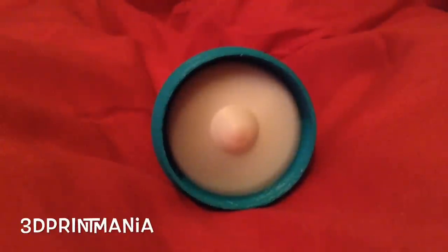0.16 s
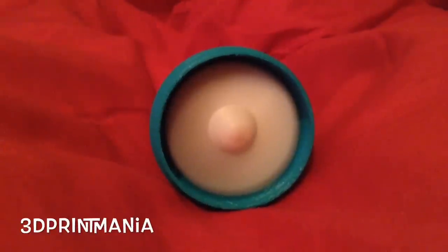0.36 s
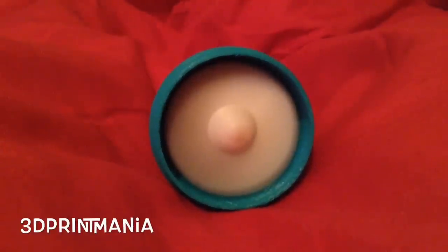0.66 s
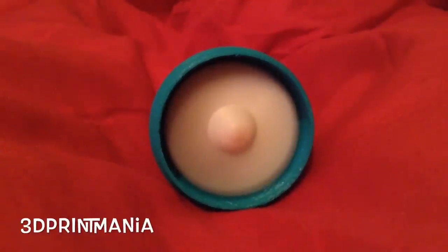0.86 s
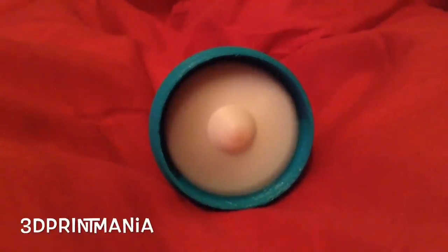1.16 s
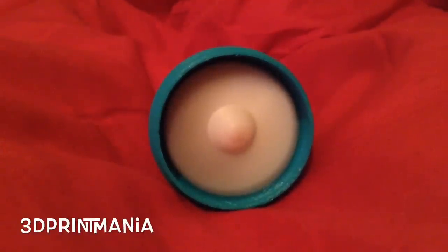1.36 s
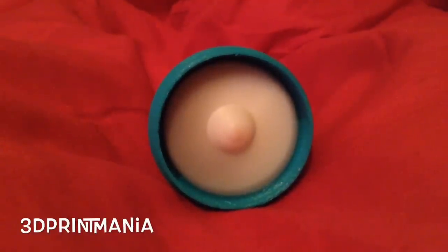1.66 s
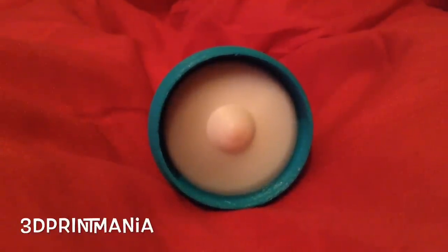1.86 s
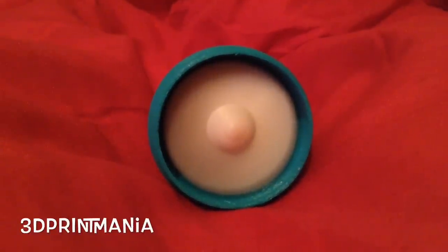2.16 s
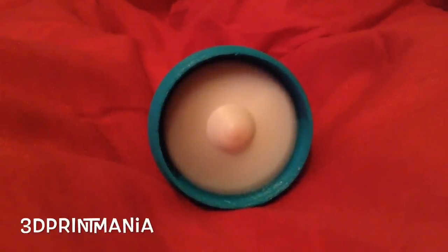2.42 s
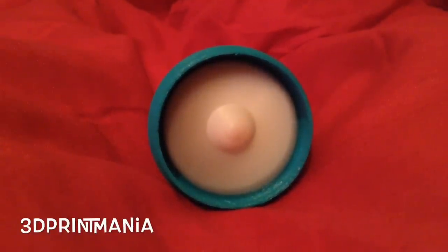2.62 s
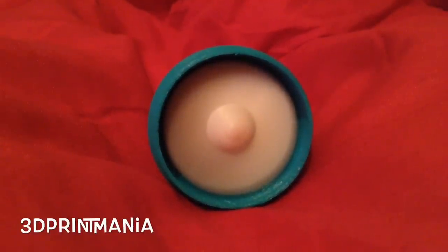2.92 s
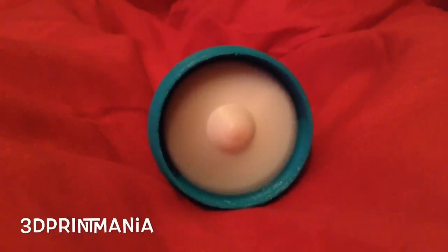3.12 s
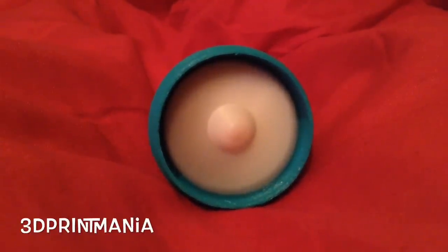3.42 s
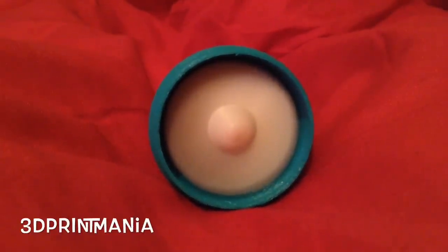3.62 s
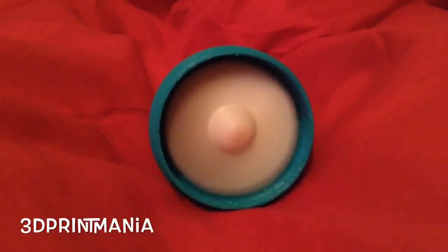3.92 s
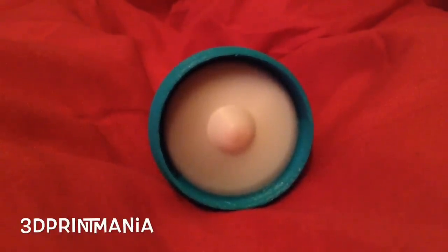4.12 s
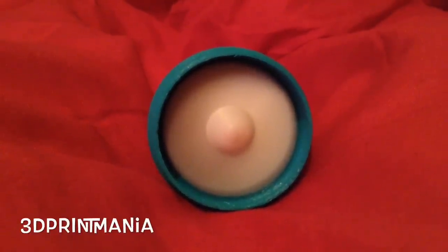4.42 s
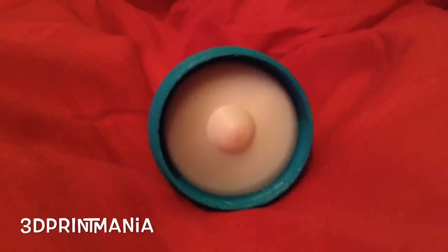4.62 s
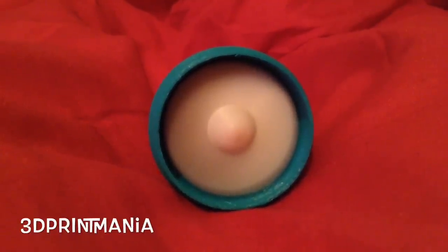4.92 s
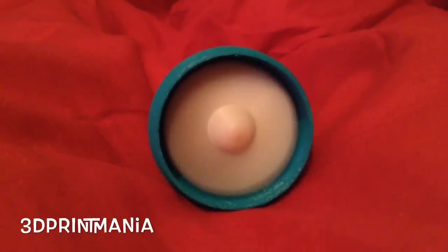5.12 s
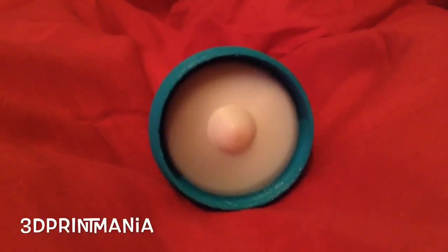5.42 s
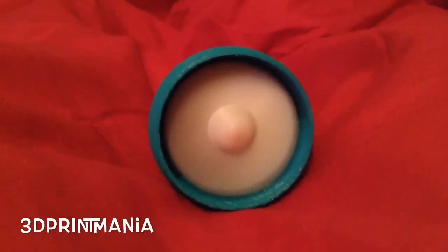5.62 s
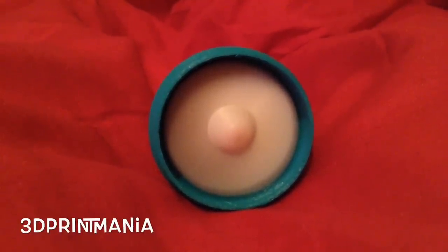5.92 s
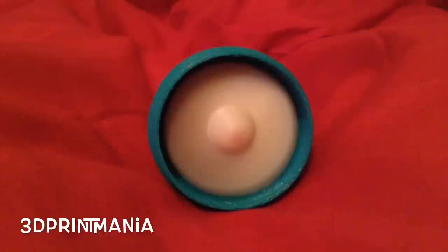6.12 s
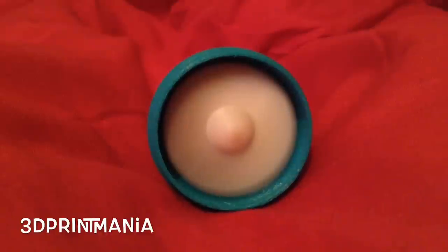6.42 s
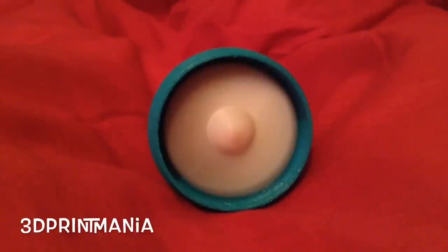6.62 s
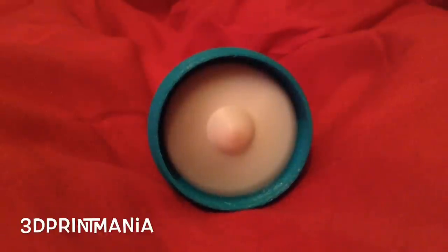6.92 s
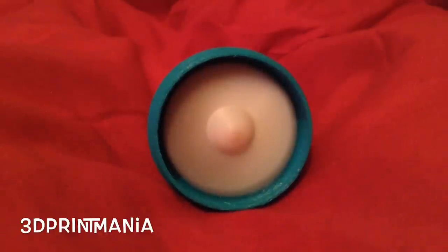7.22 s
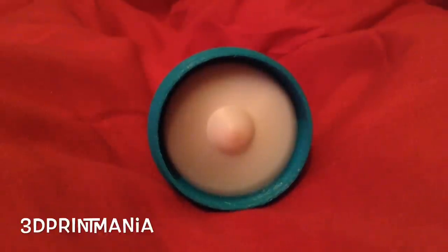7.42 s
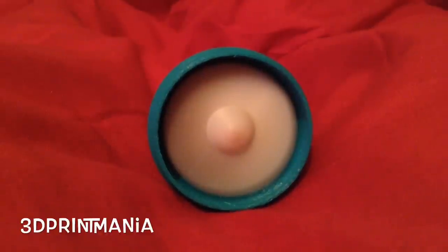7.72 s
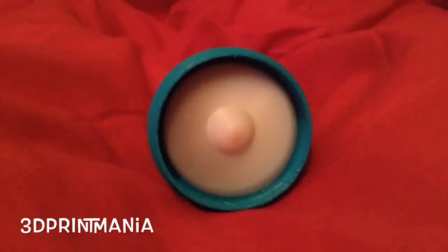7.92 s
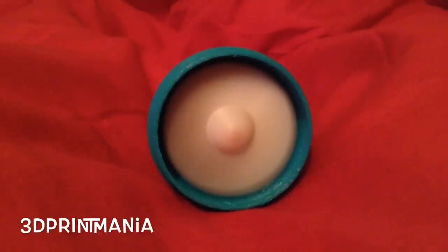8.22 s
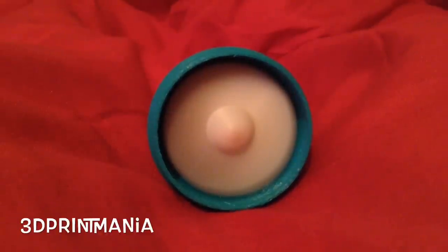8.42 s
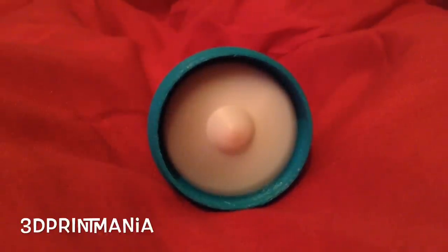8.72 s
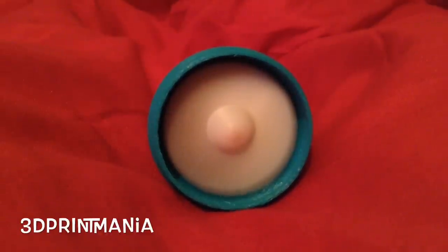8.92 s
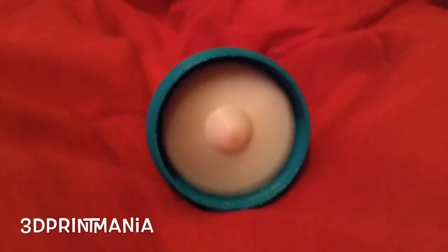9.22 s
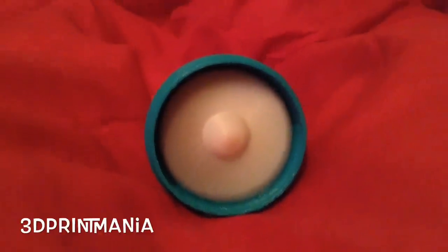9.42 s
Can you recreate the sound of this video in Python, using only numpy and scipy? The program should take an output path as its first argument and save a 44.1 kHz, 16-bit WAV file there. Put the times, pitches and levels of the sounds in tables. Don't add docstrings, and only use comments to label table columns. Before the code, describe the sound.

Very close in a quiet, soft room, fingers rub and tick lightly on plastic for a quarter second. Then a small ducted fan starts, its pitch climbing fast for about a second. It runs on with a faint low hum, smooth rushing air, gritty high brush buzz and a fixed thin whine, sagging slightly in pitch. A sharp tick comes near four seconds, with smaller clicks afterwards.

```python
import sys
import numpy as np
from scipy import signal
from scipy.fft import rfft, irfft, next_fast_len
from scipy.io import wavfile

SR = 44100
rng = np.random.default_rng(int(sys.argv[2]) if len(sys.argv) > 2 else 0)


def transcribe(signal):
    frames = np.atleast_2d(signal).T
    limited = np.clip(frames, -1, 1)
    pcm = np.round(limited * 32767).astype(np.int16)
    wavfile.write(sys.argv[1], SR, pcm)


def volts_from_decibels(level):
    exponent = np.asarray(level, float) / 20
    return 10 ** exponent


N = 421596

# start_s, speed_turns_per_s
TOP_SPEED = [(1.5, 108.022), (2.4, 107.351), (3.2, 106.862), (3.6, 106.854), (4.4, 106.402), (4.7, 106.144),
             (5.2, 105.981), (5.6, 105.526), (6.5, 105.299), (7.3, 104.868), (8.4, 104.439), (8.9, 104.427),
             (9.56, 104.174)]
# pitch_hz, level_db
HUM_ONCE = [(47, -95), (63, -68), (74, -66), (82, -69), (87, -78), (92, -61), (99.5, -52.5), (104.4, -52.8),
            (105.5, -52), (106.6, -50)]
# pitch_hz, level_db
HUM_TWICE = [(95, -80), (126, -70), (148, -65), (164, -56), (174, -54), (183, -60), (192, -62), (210, -62),
             (213.5, -60)]
# multiple_of_shaft_rate, level_db rms
BLADE_TONES = [(15, -70), (20, -56), (30, -60), (40, -66), (41, -62.5), (43, -61)]
# pitch_hz, width_hz, level_db
DUCT_RESONANCES = [(1976, 770, 0.5), (4310, 230, 2.5)]
# multiple_of_shaft_rate, running_up_db, cold_db, warm_db
BRUSH_CONTACTS = [(56, 1, 5, 7), (58, 1, 3, 5), (59, -2, 5, 1), (61, 5, 6, 9), (63, 3, 1, 4),
                  (64, -8, 2, -8), (66, 2, 9, 4), (68, 2, 6, 7), (69, -2, 0, -11), (70, -1, 7, 6),
                  (71, 3, 5, 3), (72, 5, 9, 4), (73, 3, -15, 0), (74, 0, 7, -14), (75, -1, -4, -14),
                  (76, 6, 10, 4), (77, -1, 0, -18), (78, 5, 2, 1), (79, -3, -8, -13), (80, 1, -12, 1),
                  (81, -10, -5, -1), (82, 10, 1, 8), (83, -7, -8, 7), (84, 4, -4, 6), (85, -6, 3, 5),
                  (86, 3, -4, -5), (87, -2, 5, 2), (92, 2, -6, -6), (97, 3, 0, -2), (102, 2, 2, 8)]
# start_s, warm_share (0 to 1), contact_level_db
BRUSH_SEATING = [
    (1.1, 0, -1),
    (1.5, 0.97, 0),
    (2.3, 0.2, -0.5),
    (4, 0.29, 0),
    (5.5, 0.55, 0.5),
    (7, .75, 1),
    (8.2, 1, .5),
    (9.56, 0.93, -1),
]
# pitch_hz, width_hz, level_db
HOUSING_RESONANCES = [(4270, 650, -59.5), (5851.0, 1000.0, -77), (6563, 143, -57.5), (6870, 660, -53),
                      (7710, 530, -55.5), (7880, 20, -54), (8066, 450, -49.5), (8350, 465, -50.5),
                      (9060, 120, -62), (10250, 2030, -58.5), (12270, 940, -66), (13400, 980, -65),
                      (15126.0, 900.0, -67)]
# multiple_of_chop_rate, level_db rms
CHOP_LINES = [(43, -67.0), (44, -67.6), (45, -60.6), (46, -61.9), (47, -62.4), (48, -55.8), (49, -48.0),
              (50, -50.8), (51, -57.5), (52, -77.9), (55, -66.4), (56, -64.5), (57, -62.7), (58, -56.9),
              (59, -54.9), (60, -50.4), (61, -50.3), (62, -67.1), (63, -63.9), (64, -60.4), (65, -57.8),
              (66, -63.4), (72, -65.4), (73, -62.2), (74, -56.1)]
# multiple_of_chop_rate, level_db rms
STALL_LINES = [(16, -71), (21, -68), (50, -51), (51, -50), (52, -58), (53, -63), (60, -58), (64, -56),
               (66, -54), (67, -66)]
# pitch_hz, level_db per Hz
RUSH_SPECTRUM = [(300, -18), (427, -16.5), (600, -8.5), (819, -13), (1380, -11.5), (1800, -7.5), (2060, -8),
                 (2600, -12.5), (3410, -18), (5290, -19.5), (6500, -30), (9000, -46)]
# pitch_hz, level_db per Hz
RUMBLE_SPECTRUM = [(24, -55), (40, -30), (70, -20), (100, -17), (140, -5), (205, -3.5), (330, -6.5),
                   (450, -11), (700, -22)]
# start_s, peak_db, ring_pitch_hz, edge_db
TICKS = [(0.009, -43, 802, -10), (0.056, -41, 1380, -11), (0.162, -47, 1440, -6), (0.187, -46, 676, -23),
         (0.2388, -26.5, 905, -12.5), (0.369, -35.5, 1260, -12), (1.07, -31, 799, -20),
         (1.147, -26, 1950, -28), (3.932, -12, 970, -13.5), (4.5, -26, 1840, -8), (4.962, -23.5, 830, -18)]
# start_s, peak_db, ring_pitch_hz, edge_db
SCUFF = (5, -26, 0, -8)
# pitch_hz, t60_s
CASE_MODES = [(700, 0.0046), (830, 0.022), (960, 0.017), (1110, 0.03), (1300, 0.015), (1550, 0.018),
              (1850, 0.0057), (2700, 0.036), (3600, 0.0053), (4600, 0.0048), (5500, 0.0015)]
# start_s, peak_db, pitch_hz, t60_s
KNOCKS = [
    (5.607, -34, 2950, .02),
    (6.315, -27.5, 5920, 0.037),
    (6.31, -36, 6500, .02),
    (6.315, -34, 970, .015),
    (6.323, -33, 5000, .01),
    (6.322, -40, 3400, .01),
    (9.398, -29, 280, 0.032),
    (9.399, -35, 840, 0.026),
]
# start_s, held_s, level_db
CLOTH_RUBS = [
    (-.01, .072, -55),
    (.165, .062, -52),
    (.24, .008, -50),
    (.27, .02, -66),
]
# pitch_hz, width_hz, level_db rms
ROOM_HUMS = [(106.5, 11, -78), (153, 35, -68.5), (545, 7.4, -77.5), (846.6, 25, -67.5)]
# pitch_hz, width_hz, level_db
DULL_BANDS = [(437, 92, -4), (4990, 830, -3), (10900, 800, -7.5), (11900, 110, 1), (14300, 710, -8),
              (8900, 200, -3)]
# pitch_hz, level_db
MASKED_BANDS = [(3500, -60), (4700, -36), (5300, -34), (6000, -40), (8500, -33), (9200, -26), (11000, -23),
                (13000, -24), (14500, -28)]

SWITCH_ON_S = .266
SPIN_FROM_S, SPIN_UP_S, SPIN_BEND, FULL_SPEED = .2277, .83, .5366, 106
CYCLE_POINTS = 2 ** 14

FAINT_DB, FAINT_SPREAD_DB = -5.5, 2.5
FINE_DB, FINE_SPREAD_DB = -1.6, 4
SLOTS_DB, EVEN_DB = 11, 2
CONTACT_FOLLOWS, SEATED_S = 2.1, 1.1
SHAKE_TURNS = .0012
HISS_IDLE_DB, HISS_RUN_DB, HISS_LOAD_DB = 14, 14, 14
IDLE_TOP_HZ, IDLE_AIR_DB = 8950, -7
GAP_HZ, GAP_WIDTH_HZ, GAP_DB = 5250, 700, -7

CHOP_PER_S, CHOP_SAG_PER_S2 = 204.366, .0215
RING_ON, SMEAR_RAD = .6, .55

RUSH_DB, RUSH_FOLLOWS, RUSH_STILL_DB = -43, 2.74, -66
RUMBLE_DB, RUMBLE_FOLLOWS, RUMBLE_STILL_DB = -53, 3.6, -73.5

CRACK_T60_S, CRACK_DB = 0.014, 1
RUB_RISE_DB_PER_S, RUB_FALL_DB_PER_S = 2500, 600
MIC_TOP_HZ = 15330


def in_time(rows):
    s, *columns = np.transpose(rows)
    return [np.interp(np.arange(N) / SR, s, c) for c in columns]


def rms_one(x):
    return x / np.sqrt(np.mean(x ** 2) + 1e-20)


def drift(rate):
    r = np.exp(-80 * np.pi * rate / SR)
    white = rng.standard_normal(N // 40 + 2002)
    slow = signal.lfilter([1], [1, -2 * r, r * r], white)[2000:]
    return np.interp(np.arange(N) / 40, np.arange(len(slow)), rms_one(slow))


def repeat(cycles, orders, levels_db, phases):
    lines = np.zeros(CYCLE_POINTS // 2 + 1, complex)
    lines[np.array(orders, int)] = volts_from_decibels(levels_db) * np.exp(1j * phases) * CYCLE_POINTS / np.sqrt(2)
    position = cycles % 1 * CYCLE_POINTS
    return np.interp(position, np.arange(CYCLE_POINTS), irfft(lines), period=CYCLE_POINTS)


def shaft():
    since = np.maximum(np.arange(N) / SR, SWITCH_ON_S) - SPIN_FROM_S
    return in_time(TOP_SPEED)[0] * np.tanh(since / SPIN_UP_S) ** SPIN_BEND


def rotor(turns, speed, rush_db):
    once_db = np.interp(speed, *np.transpose(HUM_ONCE))
    twice_db = np.interp(2 * speed, *np.transpose(HUM_TWICE))
    out = np.sqrt(2) * volts_from_decibels(once_db + 1.4) * np.sin(2 * np.pi * turns)
    out += np.sqrt(2) * volts_from_decibels(twice_db + 2.0 * drift(10)) * np.sin(2 * np.pi * 2 * turns)
    for order, db in BLADE_TONES:
        duct = 0
        for hz, width, peak_db in DUCT_RESONANCES:
            duct = duct + volts_from_decibels(peak_db) / (1 + (2 * (order * speed - hz) / width) ** 2)
        tone = np.sin(2 * np.pi * order * turns + 0.41 * drift(15))
        level_db = db + .5 * (rush_db + 45.5) + 1.07 * drift(24)
        out += np.sqrt(2) * volts_from_decibels(level_db) * duct * tone
    return out


def contact_levels(orders):
    chance = rng.standard_normal((3, len(orders)))
    faint_db = FAINT_DB + FAINT_SPREAD_DB * chance
    fine_db = FINE_DB + FINE_SPREAD_DB * chance[0]
    levels_db = np.where(orders < 100, faint_db, fine_db)
    levels_db[0] += EVEN_DB * (1 + (-1) ** orders)
    table = np.array(BRUSH_CONTACTS)
    levels_db[:, table[:, 0] - orders[0]] = table[:, 1:].T
    slots = (orders % 10 == 2) & (orders > 85) & (orders < 145)
    levels_db[0] += SLOTS_DB * slots * np.where(orders > 105, .4, 1)
    return levels_db


def brush_hiss(turns, load, since):
    white = rng.standard_normal(N)
    idle = signal.sosfiltfilt(signal.butter(4, IDLE_TOP_HZ, fs=SR, output="sos"), white)
    idle = volts_from_decibels(HISS_IDLE_DB) * (idle + volts_from_decibels(IDLE_AIR_DB) * (white - idle))
    sliding = white * np.hypot(volts_from_decibels(HISS_RUN_DB), volts_from_decibels(HISS_LOAD_DB) * load)
    pulse = 1 + 0.19 * np.sin(4 * np.pi * turns)
    return np.where(since > 0, sliding, idle) * pulse * volts_from_decibels(1.0 * drift(5.7))


def brushes(turns, speed):
    since = np.arange(N) / SR - SWITCH_ON_S
    warm, contact_db = in_time(BRUSH_SEATING)
    running_up = np.exp(-(np.maximum(since, 0) / SEATED_S) ** 2)
    warm = np.clip(warm, 0, 1) * (1 - running_up)
    cold = 1 - running_up - warm
    orders = np.arange(54, 260)
    phases = rng.uniform(0, 2 * np.pi, len(orders))
    turns = turns + (0.00061 + SHAKE_TURNS * running_up ** 2) * drift(25)
    contacts = 0
    for share, levels_db in zip((running_up, cold, warm), contact_levels(orders)):
        contacts = contacts + share * repeat(turns, orders, levels_db, phases)
    contacts = contacts * (since > 0) * (speed / FULL_SPEED) ** CONTACT_FOLLOWS
    hiss = brush_hiss(turns, running_up * speed / FULL_SPEED, since)
    return housing(volts_from_decibels(contact_db + 0.42 * drift(24)) * contacts + hiss)


def housing(x):
    size = next_fast_len(N + SR // 10)
    hz = np.arange(size // 2 + 1) * SR / size
    power = 0
    for centre, width, db in HOUSING_RESONANCES:
        power = power + volts_from_decibels(db) ** 2 / (1 + (2 * (hz - centre) / width) ** 2) ** 2
    gap_db = GAP_DB * np.exp(-((hz - GAP_HZ) / GAP_WIDTH_HZ) ** 2)
    return irfft(rfft(x, size) * np.sqrt(power) * volts_from_decibels(gap_db), size)[:N]


def chopper():
    t = np.arange(N) / SR
    cycles = CHOP_PER_S * t - CHOP_SAG_PER_S2 * t ** 2 / 2
    since = t - SWITCH_ON_S
    orders, levels_db = np.arange(43, 76), np.full(33, -100.)
    for order, db in CHOP_LINES:
        levels_db[order - orders[0]] = db
    log_level = np.log(volts_from_decibels(np.maximum(levels_db, -80)))
    phases = -RING_ON * np.imag(signal.hilbert(log_level)) + rng.normal(0, SMEAR_RAD, len(orders))
    whine = volts_from_decibels(.5 * drift(18)) * repeat(cycles, orders, levels_db, phases)
    stall_phases = rng.uniform(0, 2 * np.pi, len(STALL_LINES))
    stall = repeat(cycles, *np.transpose(STALL_LINES), stall_phases)
    stall = volts_from_decibels(-40 * np.maximum(since, 0)) * stall
    return np.clip(since / .003, 0, 1) * (whine + stall)


def flow(speed, full_db, follows, still_db):
    moving = (np.arange(N) > SWITCH_ON_S * SR) * volts_from_decibels(full_db) * (speed / FULL_SPEED) ** follows
    return 20 * np.log10(np.hypot(moving, volts_from_decibels(still_db)))


def turbulence(points, patchy_db):
    hz, db = np.transpose(points)
    out, together, white = 0, drift(6.9), rng.standard_normal((2, N))
    edges = 25 * 2 ** np.arange(0, 9, 1 / 3)
    for k, (low, high) in enumerate(zip(edges, edges[1:])):
        if hz[0] < high and low < hz[-1]:
            band = signal.sosfilt(signal.butter(2, [low, high], "band", fs=SR, output="sos"), white[k % 2])
            level_db = np.interp(np.log(low * high) / 2, np.log(hz), db)
            flicker_db = patchy_db * (0.5 * together + drift(19))
            out = out + band * volts_from_decibels(level_db + flicker_db)
    return rms_one(out)


def air(rush_db, rumble_db):
    rush = turbulence(RUSH_SPECTRUM, patchy_db=0.9)
    top = signal.sosfiltfilt(signal.butter(4, 4300, "high", fs=SR, output="sos"), rush)
    rush = rush - top * (1 - np.minimum(volts_from_decibels(2.5 * (rush_db + 45)), 1))
    ridge = signal.sosfilt(signal.butter(2, [1800, 2200], "band", fs=SR, output="sos"), rush)
    rumble = turbulence(RUMBLE_SPECTRUM, patchy_db=2.0)
    return volts_from_decibels(rush_db - 0.34) * (rush + 0.26 * ridge) + volts_from_decibels(rumble_db) * rumble


def hand():
    return ticks() + cracks() + sum(ring(*knock) for knock in KNOCKS) + cloth()


def ring(s, db, hz, t60):
    at, out = int(np.ceil(s * SR)), np.zeros(N)
    t = at / SR - s + np.arange(int(t60 * SR)) / SR
    rise = np.minimum(t * hz, 1)
    out[at:at + len(t)] = volts_from_decibels(db - 60 * t / t60) * np.sin(2 * np.pi * hz * t) * rise
    return out


def ticks():
    out = 0
    uneven_db = rng.normal(0, 2, (len(TICKS), len(CASE_MODES)))
    for (s, db, hz, edge_db), uneven in zip(TICKS, uneven_db):
        for (mode_hz, t60), own_db in zip(CASE_MODES, uneven):
            away_db = edge_db if mode_hz > 2500 else -12 * abs(np.log2(mode_hz / hz))
            out = out + ring(s, db - 3.5 + away_db + own_db, mode_hz, t60)
    return signal.sosfilt(signal.butter(4, 600, "high", fs=SR, output="sos"), out + 1e-18)


def cracks():
    t = np.arange(N) / SR
    burst = 0
    for s, db, _, edge_db in TICKS + [SCUFF]:
        fall_db = 60 * np.clip((t - s) / CRACK_T60_S, 0, 2)
        sounding = (t > s) * (t < s + 2 * CRACK_T60_S)
        burst = burst + sounding * volts_from_decibels(db + edge_db + CRACK_DB - fall_db)
    band = signal.butter(2, [1800, 5800], "band", fs=SR, output="sos")
    return burst * rms_one(signal.sosfilt(band, rng.standard_normal(N)))


def cloth():
    t = np.arange(N) / SR
    rubs = 0
    for s, held, db in CLOTH_RUBS:
        rise_db = RUB_RISE_DB_PER_S * np.clip(s - t, 0, 1)
        fall_db = RUB_FALL_DB_PER_S * np.clip(t - s - held, 0, 1)
        rubs = rubs + volts_from_decibels(db - rise_db - fall_db)
    band = signal.butter(4, [640, 1550], "band", fs=SR, output="sos")
    fibres = rms_one(signal.sosfilt(band, rng.standard_normal(N)))
    return rubs * volts_from_decibels(3.0 * drift(60)) * fibres


def room():
    out = 0
    for hz, width, db in ROOM_HUMS:
        r = np.exp(-np.pi * width / SR)
        pole = [1, 0, -1, 1, -2 * r * np.cos(2 * np.pi * hz / SR), r * r]
        out = out + volts_from_decibels(db) * rms_one(signal.sosfilt([pole, pole], rng.standard_normal(N)))
    return out


def scene():
    speed = shaft()
    turns = np.cumsum(speed) / SR
    rush_db = flow(speed, RUSH_DB, RUSH_FOLLOWS, RUSH_STILL_DB)
    rumble_db = flow(speed, RUMBLE_DB, RUMBLE_FOLLOWS, RUMBLE_STILL_DB)
    motor = rotor(turns, speed, rush_db) + brushes(turns, speed) + chopper()
    return (motor + air(rush_db, rumble_db) + hand() + room())[None]


def shape_tone(x):
    size = next_fast_len(N + SR // 10)
    hz = np.arange(size // 2 + 1) * SR / size
    dips_db = sum(db * np.exp(-(2 * (hz - centre) / width) ** 4) for centre, width, db in DULL_BANDS)
    coloured = irfft(rfft(x, size) * volts_from_decibels(dips_db) * (hz < MIC_TOP_HZ), size)[:N]
    return signal.sosfilt(signal.butter(1, 70, "high", fs=SR, output="sos"), coloured)


def mute_masked(x):
    hz, _, frames = signal.stft(x, SR, nperseg=2048)
    band = np.arange(len(hz)) // 5
    power = np.add.reduceat(abs(frames) ** 2, np.arange(0, len(hz), 5))
    limit = volts_from_decibels(np.interp(hz[::5], *np.transpose(MASKED_BANDS)) - 1) ** 2
    loudest = power[band[hz > 4000][0]:].max(axis=0)
    kept = power > limit[:, None] * loudest
    return signal.istft(frames * kept[band], SR, nperseg=2048)[1][:N]


def top_cut(x):
    return signal.sosfilt(signal.butter(12, 15630, fs=SR, output="sos"), x)


def record(dry):
    mix = mute_masked(shape_tone(dry[0]))[None]
    return top_cut(mix)


dry = scene()
out = record(dry)
transcribe(out)
```